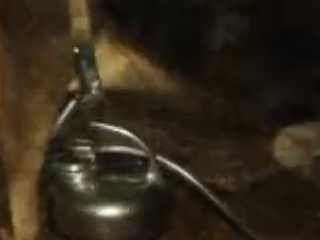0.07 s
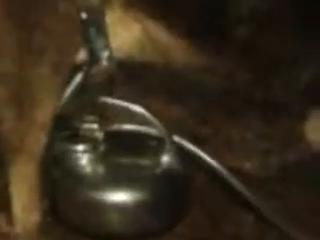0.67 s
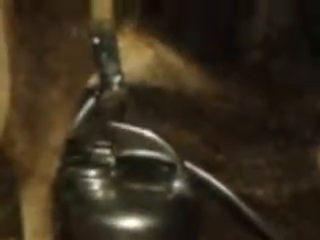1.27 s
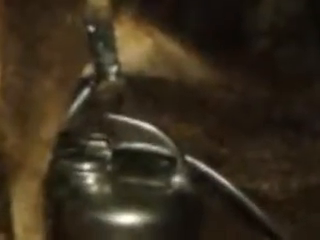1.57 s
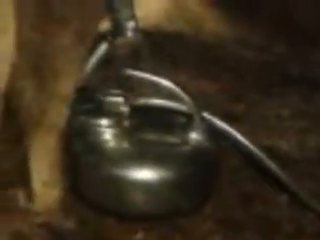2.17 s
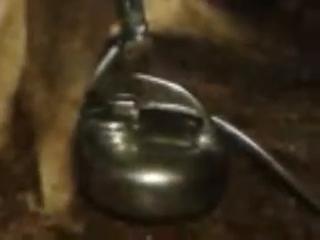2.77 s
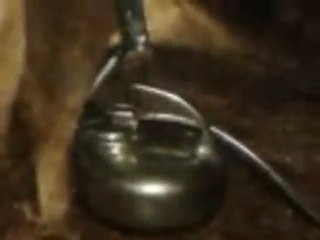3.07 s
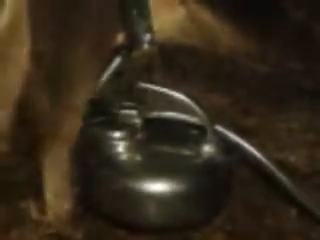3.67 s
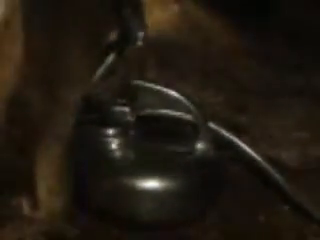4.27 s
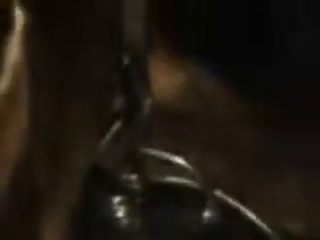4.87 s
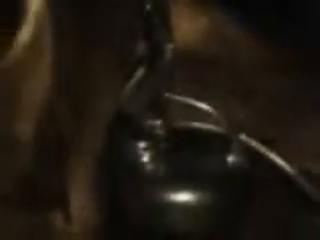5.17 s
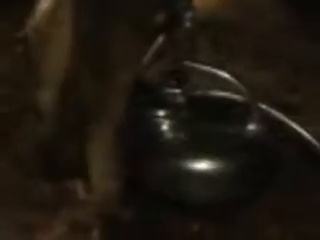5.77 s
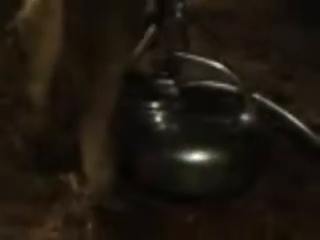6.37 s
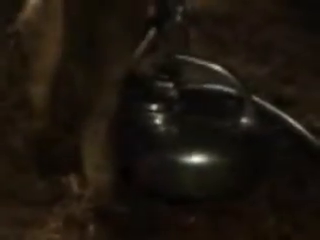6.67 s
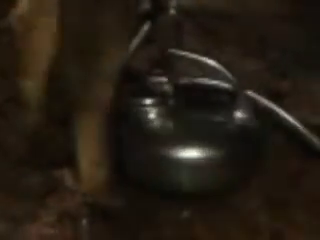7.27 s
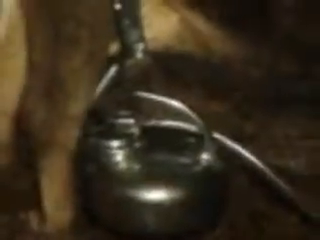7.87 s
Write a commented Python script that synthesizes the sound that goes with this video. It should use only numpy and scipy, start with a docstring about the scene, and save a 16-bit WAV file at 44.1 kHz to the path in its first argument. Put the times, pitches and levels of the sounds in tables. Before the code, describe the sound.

A milking machine's vacuum pump drones steadily in a shed, with a motor whine, constant air hiss and faint regular puffs.

```python
"""A small milking shed, one microphone moving about near a bucket milker at work under a cow.
The belt-driven four-vane vacuum pump drones steadily under its motor's whine, with a rattle that
comes round again on every lap of the belt. Air hisses into the vacuum line, leaking seals whistle,
the pulsator vents a faint puff on each cycle, and a teat cup slurps briefly near the end."""
import sys
import numpy as np
from scipy import signal
from scipy.fft import rfft, irfft, next_fast_len
from scipy.io import wavfile
from scipy.ndimage import map_coordinates

SR = 44100
rng = np.random.default_rng(int(sys.argv[2]) if len(sys.argv) > 2 else 0)


def output_pcm(signal):
    """Save a mono or channel-first signal as 16-bit PCM at the path in sys.argv[1].

    Samples are clipped to [-1, 1] before scaling.
    """
    pcm = np.clip(np.atleast_2d(signal).T, -1, 1) * 32767
    wavfile.write(sys.argv[1], SR, np.round(pcm).astype(np.int16))


N = 353241

SHAFT_HZ, TURNS_PER_LAP = 29.325, 11  # pump speed; shaft turns to one lap of the belt


def amp(db):
    """Decibels to gain."""
    return 10 ** (np.asarray(db) / 20)


def unit(x):
    """x scaled to rms 1."""
    return x / np.sqrt(np.mean(np.abs(x) ** 2) + 1e-20)


def clock():
    """The time of every sample in seconds."""
    return np.arange(N) / SR


def curve(points):
    """(seconds, value) points joined by straight lines, at every sample."""
    return np.interp(clock(), *np.transpose(points))


def swell(peak_s, half_s):
    """A bell-shaped rise and fall around a moment."""
    return np.exp(-np.minimum(0.5 * ((clock() - peak_s) / half_s) ** 2, 20))


def wobble(rate):
    """A smooth random curve, rate knots a second."""
    times = np.append(np.arange(0, N, 128), N) / SR
    knots = rng.standard_normal(int(N * rate / SR) + 4)
    return np.interp(clock(), times, map_coordinates(knots, [times * rate], mode="mirror"))


def filtered(x, response):
    """x through a gain given as a function of frequency."""
    size = next_fast_len(N + SR // 4)
    return irfft(rfft(x, size) * response(np.fft.rfftfreq(size, 1 / SR)), size)[:N]


def coloured(x, spectrum, resonances=()):
    """x through a broad spectrum with resonant lifts on it, at rms 1."""
    grid = np.geomspace(10, SR / 2, 6000)
    corner_hz, db = np.transpose(spectrum)
    lifts = sum(lift / (1 + (2 * (grid - centre) / width) ** 2) for centre, width, lift in resonances)
    gain = amp(np.interp(np.log(grid), np.log(corner_hz), db) + lifts)
    return unit(filtered(x, lambda hz: np.interp(hz, grid, gain)))


def shift_band(x, centre_hz, width_hz, level_db):
    """x with one band raised or lowered by a level curve."""
    band = filtered(x, lambda hz: np.exp(-((hz - centre_hz) / width_hz) ** 2))
    return x + (amp(level_db) - 1) * band


def narrow_noise(hz, width, evenness=0.83):
    """A rubbed resonance at rms 1: its pitch wanders, its strength stays fairly even."""
    band = filtered(rng.standard_normal(N), lambda f: 1 / (1 + (2 * (f - hz) / width) ** 2))
    ring = signal.hilbert(band, next_fast_len(N))[:N]
    return unit(ring.real / (np.abs(ring) + 1e-9) ** evenness)


def standing_waves(pump, growl_offset_db=-0.8):
    """Bands of the pump's sound grow and fade as the microphone moves through the standing waves."""
    # Each row, in all five: time in seconds, level of the band in dB (the growl's about its mean).
    growl = [(0.2, -39.5), (3.9, -42), (6.12, -42.5), (7.8, -41.5)]
    boom = [(.3, 2), (2, 0.5), (4.5, 1.5), (5.5, -.5), (7.5, -0.5)]
    hum = [(.5, -1), (3, 0), (4.9, 1), (6.2, 0), (7.5, -6)]
    buzz = [(.3, -1), (1.5, -0.5), (3.6, 0.3), (5.3, -1), (6.5, -4), (7.7, 0)]
    ring = [(.1, 3), (1.2, -0.5), (3.5, 1), (4.3, -7), (5.2, -4), (6.1, 3.5), (8, 1)]
    growl_db = curve(growl) - curve(growl).mean() + growl_offset_db
    pump = shift_band(pump, centre_hz=825, width_hz=260, level_db=growl_db)
    pump = shift_band(pump, centre_hz=370, width_hz=65, level_db=curve(boom))
    pump = shift_band(pump, centre_hz=487, width_hz=18, level_db=curve(hum))
    pump = shift_band(pump, centre_hz=970, width_hz=85, level_db=curve(buzz))
    return shift_band(pump, centre_hz=1880, width_hz=54, level_db=curve(ring))


def singing_pipe():
    """Far back in the sound, a pipe starts to sing along towards the end."""
    # In order: peak time and half length in seconds, pitch and width in Hz, peak level in dB.
    note = (7, 1.5, 746.5, 0.5, -57)
    peak_s, half_s, hz, width, db = note
    return amp(db) * swell(peak_s, half_s) * narrow_noise(hz, width)


def side_tones():
    """Unbalance, mains hum and pipework add weak tones, most wavering in strength and phase."""
    # Each row: pitch in Hz, level in dB, width in Hz, depth of the waver from 0 to 1.
    tones = [(59, -73.5, .2, 0), (87, -64.5, .2, 0), (119.8, -62.5, .1, 0.1), (147.2, -51, 0.91, 0.4),
             (179, -61.5, 0.21, 0.35), (240, -58, .1, 0.04), (596, -61.5, .5, 0.07), (1095, -65, 0.46, .3),
             (1583, -55.5, 1.7, 0.4), (1345, -62, 2, 1), (1710, -63, 1.8, 0.5), (3410, -61, 3.3, 0.8),
             (3550, -63, 3, 0.7)]
    out = np.zeros(N)
    for hz, db, width, depth in tones:
        waver = unit(1 + depth * (wobble(2 * width) + 1j * wobble(2 * width)))
        tone = np.exp(2j * np.pi * (hz * clock() + rng.random()))
        out += amp(db) * np.sqrt(2) * np.real(waver * tone)
    return out


def seal_whistles(flicker_db=3, flicker_rate=24, wander_rate=90):
    """Thin, flickering whistles come and go as the leaking rubber seals shift."""
    # Each row: peak time and half length in seconds, pitch and its wander in Hz, peak level in dB.
    whistles = [(0.77, 0.87, 5135, 20, -49.5), (2.3, .22, 5600, 14, -48.5), (3.4, .5, 5140, 18, -51),
                (2.5, 0.66, 6150, 24, -50), (4.6, 0.5, 5185, 18, -49.5), (5.9, .3, 6155, 20, -47),
                (6.5, 0.52, 4360, 22.2, -51.5), (7.3, .4, 4395, 36, -52.5), (6.8, .5, 6200, 18.6, -53),
                (4.8, 2.4, 3185, 29.9, -56), (0.89, 1.5, 6770, 23, -53.5), (6.6, .5, 7455, 25, -54)]
    out = np.zeros(N)
    for peak_s, half_s, hz, wander_hz, db in whistles:
        cycles = np.cumsum(hz + wander_hz * wobble(wander_rate)) / SR
        level = amp(db + flicker_db * wobble(flicker_rate)) * swell(peak_s, half_s)
        out += level * np.sqrt(2) * np.sin(2 * np.pi * cycles)
    return out


def pulsator(rise_s=0.024, sag_s=0.2, tail_s=0.23, sputter_db=1.5, tail_flutter_db=4):
    """Each cycle the valve passes a puff that sags and sputters, then trails off in a wavering hiss."""
    # Each row: start in seconds, level in dB, length in seconds, faint tail in dB against the puff.
    puffs = [(.44, -44, 0.15, -17), (1.082, -45.5, 0.14, -17), (1.723, -44, .15, -18),
             (2.355, -46, 0.16, -16), (3, -49, .16, -9), (3.64, -48, .17, -4), (4.26, -47, .22, -10),
             (4.915, -47, 0.16, -9), (5.558, -45, .15, -23), (6.205, -46, .17, -25), (6.85, -45, .12, -26),
             (7.485, -44.5, 0.16, -19)]
    # The puff's bright hiss, with a dip near 12 kHz and a thin sizzle near 14 kHz.
    # Each row: frequency in Hz, level in dB.
    spectrum = [(1500, -30), (4000, -3), (8500, -4.5), (10000, -1.5), (11500, -24), (12700, -34),
                (13500, -5.5), (14400, -1), (14800, -26)]
    envelope = np.zeros(N)
    tail_flutter = amp(tail_flutter_db * wobble(22))
    for start_s, db, length_s, tail_db in puffs:
        age = np.maximum(clock() - start_s, 0)
        onset = 1 - np.exp(-(age / rise_s) ** 2)
        puff = np.exp(-age / sag_s - (age / length_s) ** 4)
        tail = amp(tail_db) * np.exp(-age / tail_s) * tail_flutter
        envelope += amp(db) * onset * (puff + tail)
    sputter = amp(sputter_db * wobble(55))
    return envelope * sputter * coloured(rng.standard_normal(N), spectrum)


def teat_cup(ring_db=16, attack_s=0.0013, release_s=0.0043):
    """The rubber liner snaps open, sucks air that rings in the gap, and seals again."""
    # Each row: start in seconds, level in dB, seconds open, pitch and width of the gap's ring in Hz.
    slips = [(6.539, -30.5, .015, 5950, 650), (6.559, -34, .01, 5850, 600),
             (6.574, -33.5, 0.012, 6000, 700), (6.597, -36, .008, 5700, 700),
             (6.663, -38, 0.018, 5900, 1100), (6.997, -36, .02, 6000, 1300), (7.09, -38, .025, 6000, 1100),
             (7.211, -38, .016, 6200, 1200), (7.238, -38, .018, 5650, 900),
             (7.268, -31.5, .012, 5550, 1300), (7.281, -28.5, 0.013, 5750, 1500)]
    # Air slipping past the liner. Each row: frequency in Hz, level in dB.
    slurp = [(800, -16), (2000, 0), (3500, 3), (4600, -5), (5300, 3), (6500, 6), (8000, -4), (10000, -18),
             (12000, -40)]
    out = np.zeros(N)
    for start_s, db, open_s, hz, width_hz in slips:
        age = np.maximum(clock() - start_s, 0)
        opening = 1 - np.exp(-age / attack_s)
        sealing = np.exp(-np.clip((age - open_s) / release_s, 0, 20))
        air = coloured(rng.standard_normal(N), slurp, [(hz, width_hz, ring_db)])
        out += amp(db) * opening * sealing * air
    return out


def air_leak(turns, shaft_depth=0.04, belt_depth=0.029, unsteady_db=0.53):
    """Air hisses into the vacuum line, throbbing slightly with the pump; it sags a little and recovers."""
    # The inrushing air. Each row: frequency in Hz, level in dB.
    spectrum = [(200, -65), (1000, -32), (2500, -14), (3700, -7.5), (5000, -2.5), (6000, 0), (7400, -7.5),
                (8000, -7.5), (9600, -14.5), (10500, -19), (11300, -40), (14000, -68)]
    # The pipe's resonances. Each row: centre in Hz, width in Hz, lift in dB.
    pipe = [(2220, 170, 10.4), (2820, 89, 8.2), (3110, 310, 7.8), (3496, 25, 8.4), (3935, 78, 5.3),
            (4330, 110, 3.8), (4605, 40, 4.7), (5180, 140, 4.6), (5620, 87, 3), (5860, 100, 3.1),
            (6130, 91, 6.2), (6370, 73, 4.8), (6950, 230, 5.3), (7460, 150, 6.9), (7630, 69, 4.9),
            (8930, 69, 3.5)]
    # Each row: time in seconds, then dB: the level of the whole hiss, and the lift of its treble.
    leak = [(0, -36.5), (2.8, -37), (4.8, -37.5), (6, -37), (8, -36.5)]
    treble = [(0, -0.5), (2.4, 0.5), (2.9, -1), (4.8, -1.5), (5.6, 1.5), (8, 1)]
    angle = 2 * np.pi * turns
    flow = (1 + shaft_depth * np.cos(angle)) * (1 - belt_depth * np.cos(angle / TURNS_PER_LAP))
    level_db = curve(leak) + unsteady_db * wobble(12)
    hiss = amp(level_db) * coloured(flow * rng.standard_normal(N), spectrum, pipe)
    return shift_band(hiss, centre_hz=10100, width_hz=2400, level_db=curve(treble))


def motor_whine(hz=846.5, wander_hz=0.29, level_db=-44, flutter_db=0.5):
    """The motor holds one firm, slightly wandering tone."""
    cycles = np.cumsum(hz + wander_hz * wobble(3)) / SR
    return amp(level_db + flutter_db * wobble(6.7)) * np.sqrt(2) * np.sin(2 * np.pi * cycles)


def shaft_turns(sway=0.00077, drift=0.00043):
    """Turns the pump has made so far; the uneven belt tugs the speed twice a lap."""
    tug = np.cos(4 * np.pi * SHAFT_HZ / TURNS_PER_LAP * clock())
    return np.cumsum(SHAFT_HZ * (1 + sway * tug + drift * wobble(8))) / SR


def belt_rub(turns, peak_lap=0.45, sharpness=1.27):
    """Once a lap the belt's stiff joint brushes its guard; the ring slowly shifts from high to low."""
    # The guard's resonances. Each row: pitch and width in Hz, level in dB at the start and at the end.
    guard = [(597, 24, -57, -56.5), (684, 82, -64, -50), (749, 12, -61, -57), (1163, 36, -53.5, -55.5),
             (1876, 11, -55, -65), (3120, 240, -60, -61)]
    contact = unit(np.exp(sharpness * np.cos(2 * np.pi * (turns / TURNS_PER_LAP - peak_lap))))
    ring = sum(amp(np.linspace(start_db, end_db, N)) * narrow_noise(hz, width)
               for hz, width, start_db, end_db in guard)
    return contact * ring


def vane_rattle(turns, level_db=-38.5, repeat=0.34, vane_depth=0.076, shaft_depth=0.057, belt_depth=0.05):
    """Vanes scrape and knock the casing under a constant vacuum; part of it repeats on each belt lap."""
    # The scraping. Each row: frequency in Hz, level in dB.
    spectrum = [(25, -25), (50, -26), (90, -13), (200, -6.5), (500, -10), (780, 1), (1050, -4.5),
                (1800, -7), (2500, -10), (4000, -28), (9000, -64)]
    # The casing's resonances and the gaps between them. Each row: centre in Hz, width in Hz, lift in dB.
    casing = [(146.5, 8.4, 23), (267.7, 8.4, 12.5), (295, 5.1, 9), (324, 6, 8.5), (439, 43, 8.5),
              (510, 31, 0), (538, 20, 5.5), (565, 8.9, 3), (618, 16, -2), (654, 10, 3), (667, 12, -7),
              (735, 6.4, 4), (744, 9, 4), (775, 11, 4), (796, 13, 5.5), (814, 9, -1), (848, 33, 3.5),
              (890, 21, 4), (1157, 29, 2.4), (1220, 24, 3.5), (1320, 28, 4), (1430, 10, 6), (1510, 26, 4.8),
              (1580, 42, 8), (1753, 24, 4.5), (1783, 21, 5.5), (1905, 52, 3.2)]
    lap = rng.standard_normal(round(SR * TURNS_PER_LAP / SHAFT_HZ))
    scrape = np.sqrt(repeat) * np.resize(lap, N) + np.sqrt(1 - repeat) * rng.standard_normal(N)
    angle = 2 * np.pi * turns
    pressure = 1 + vane_depth * np.cos(4 * angle)
    pressure *= 1 + shaft_depth * np.cos(angle)
    pressure *= 1 - belt_depth * np.cos(angle / TURNS_PER_LAP)
    return amp(level_db) * coloured(scrape * pressure, spectrum, casing)


def pump_drone(turns, vanes=4):
    """Each vane pushes out a gulp of air; the two lowest tones peak together, the shed scatters the rest."""
    # Each row: multiple of the vane rate, level in dB, flutter in dB.
    harmonics = [(1, -32.5, 0.2), (2, -31, 0.2), (3, -47.5, 1), (4, -50, 1.4), (5, -55, 1.5), (6, -51, 1),
                 (7, -53.5, 0), (8, -46.5, 0.9), (9, -57, 4), (10, -58.5, 5), (13, -59, 2.5),
                 (14, -52, 1.5), (15, -57.5, 2.5), (16, -56, 1.5), (18, -58, 2.5)]
    out = np.zeros(N)
    for order, db, flutter_db in harmonics:
        scatter = rng.random() * (order > 2)
        cycles = vanes * order * turns + scatter
        out += amp(db + flutter_db * wobble(14)) * np.sqrt(2) * np.cos(2 * np.pi * cycles)
    return out


def scene():
    """Pump, motor and air all reach one microphone, the same in both channels."""
    turns = shaft_turns()
    pump = standing_waves(pump_drone(turns) + side_tones() + vane_rattle(turns) + belt_rub(turns))
    machine = pump + motor_whine() + singing_pipe()
    mono = machine + air_leak(turns) + seal_whistles() + pulsator() + teat_cup()
    return np.array([mono, mono])


def record(dry, top_hz=14700):
    """One microphone channel, doubled, with nothing above its band limit."""
    mono = filtered(dry.mean(axis=0), lambda hz: hz < top_hz)
    return np.array([mono, mono])


dry = scene()
out = record(dry)
output_pcm(out)
```